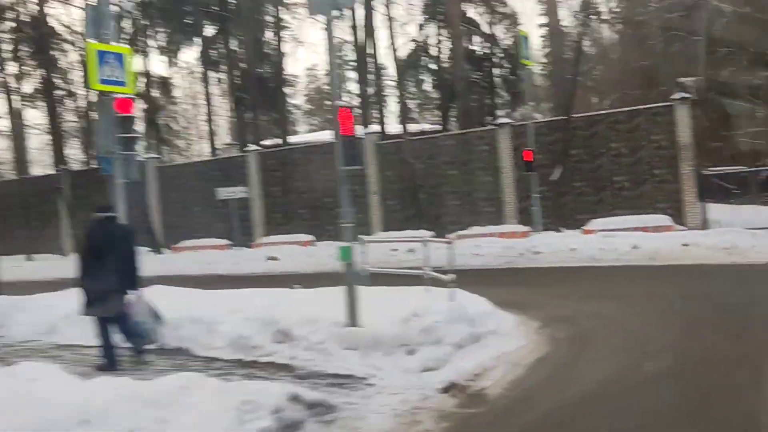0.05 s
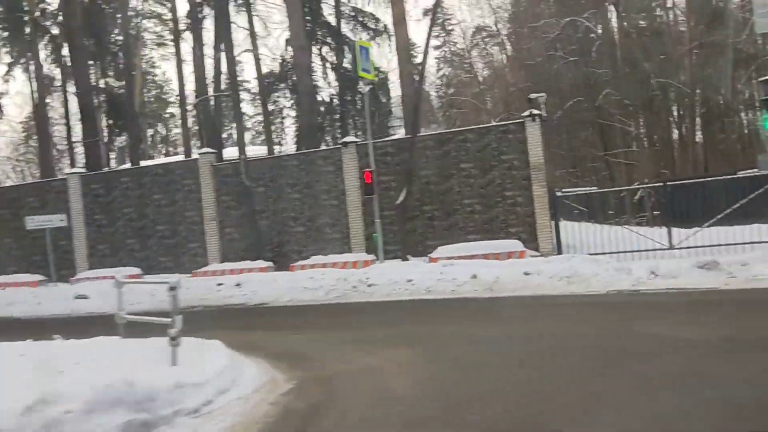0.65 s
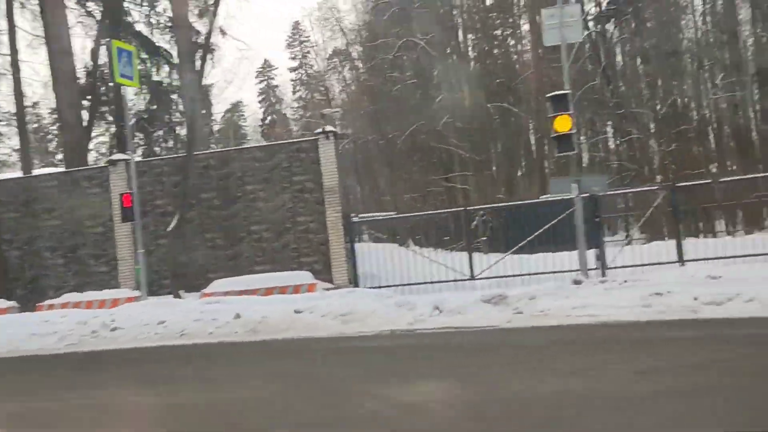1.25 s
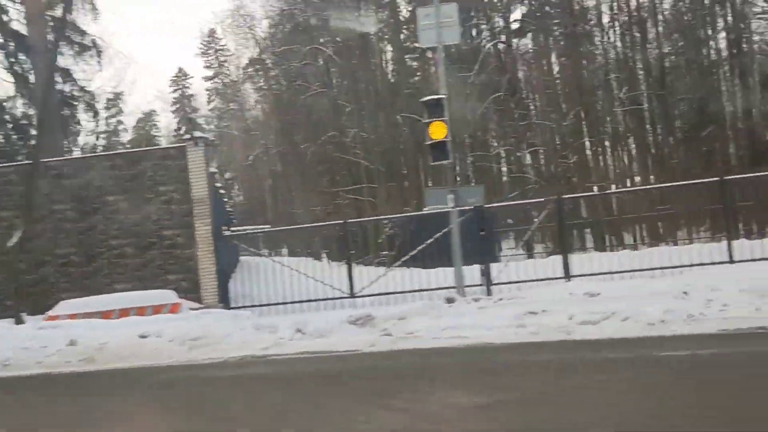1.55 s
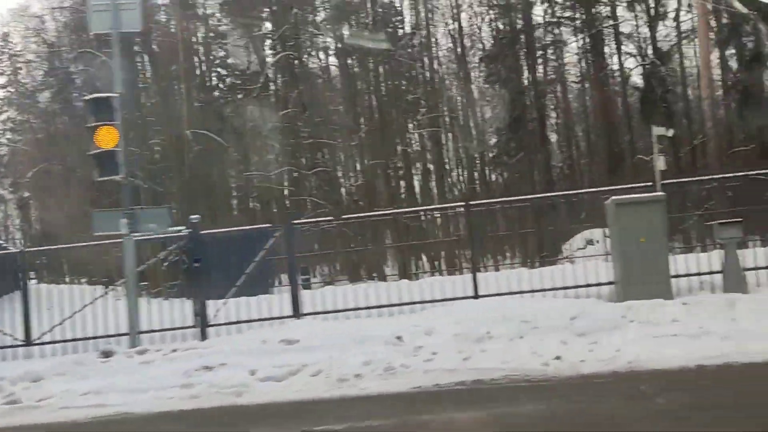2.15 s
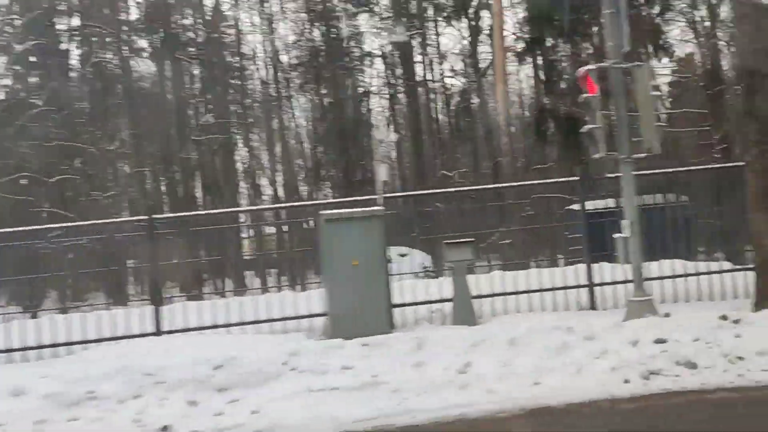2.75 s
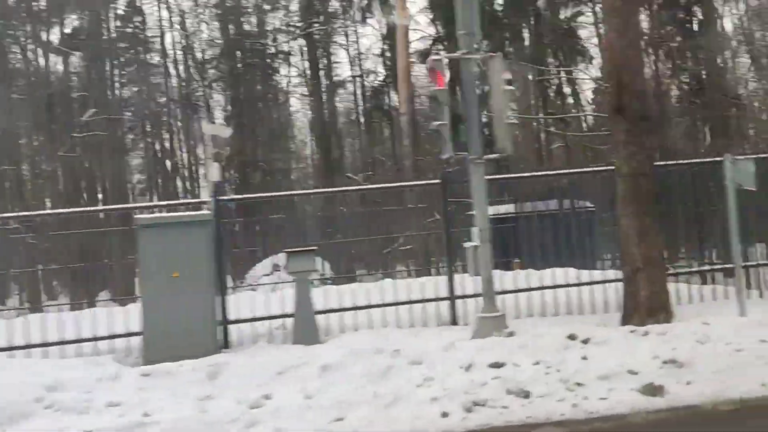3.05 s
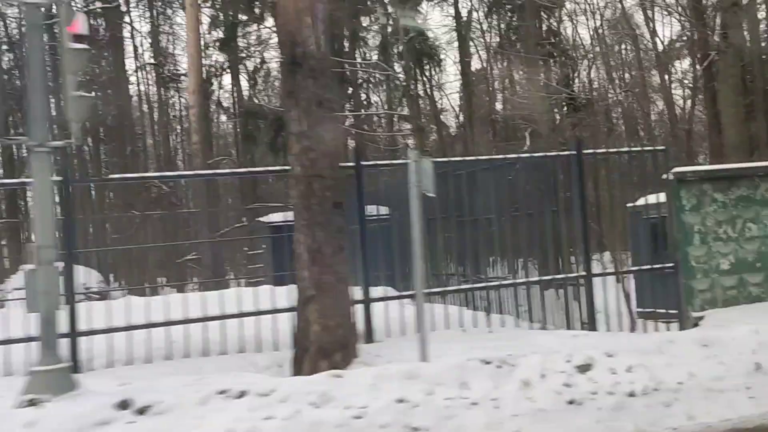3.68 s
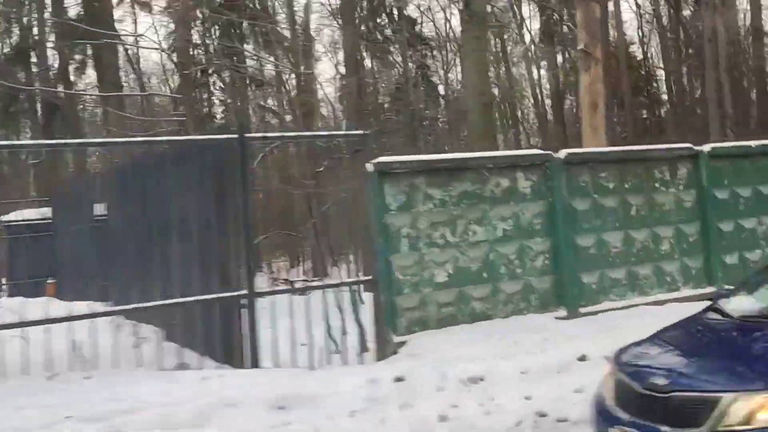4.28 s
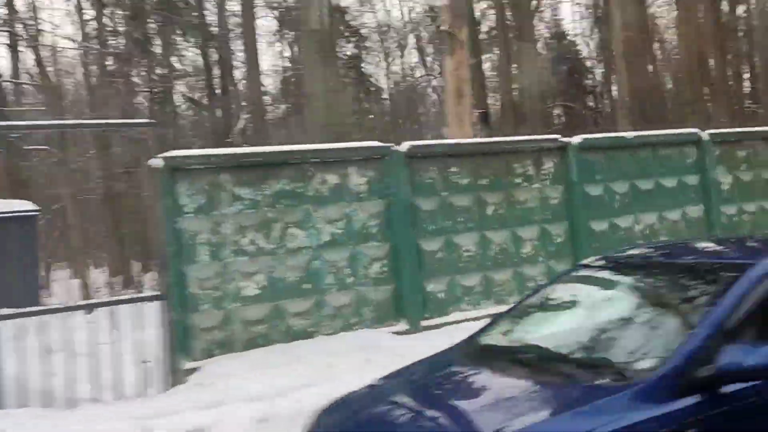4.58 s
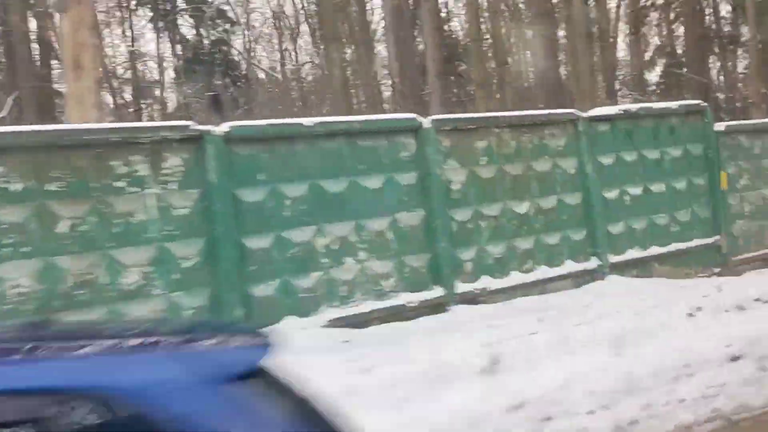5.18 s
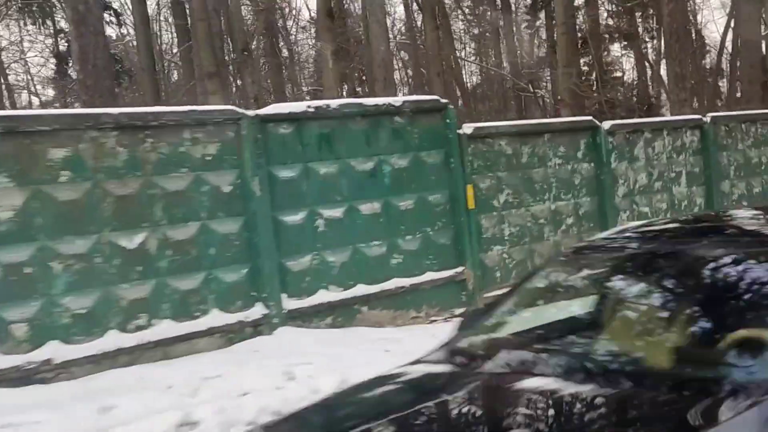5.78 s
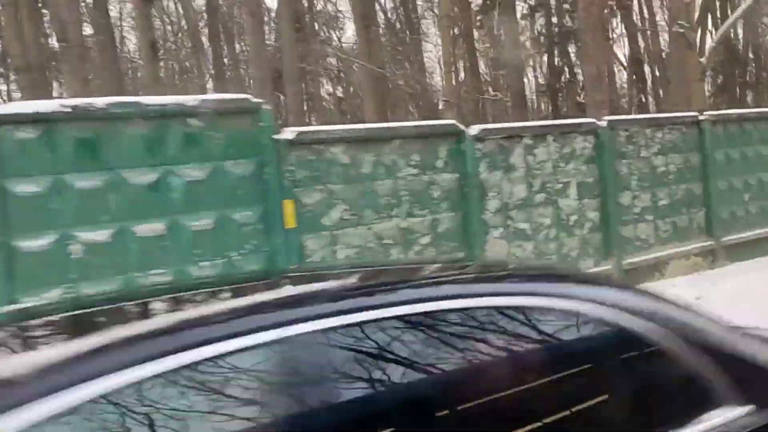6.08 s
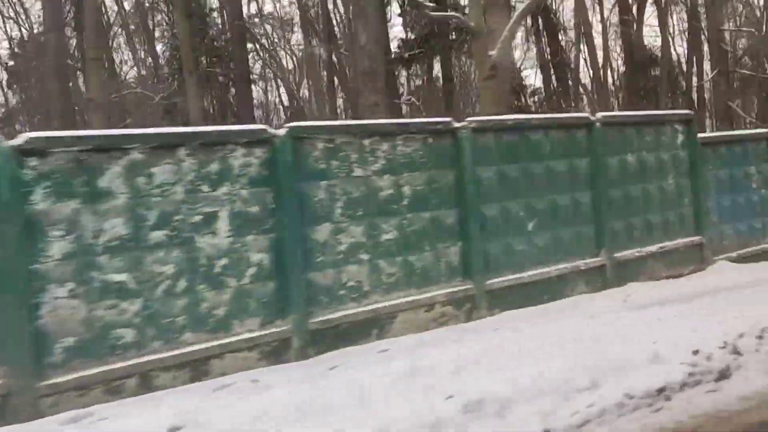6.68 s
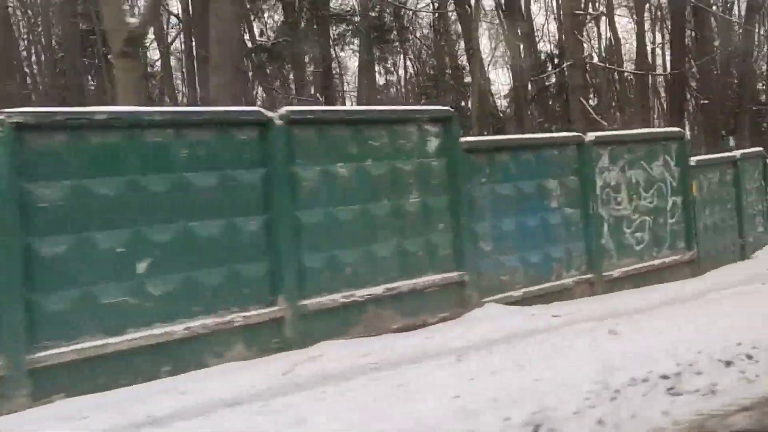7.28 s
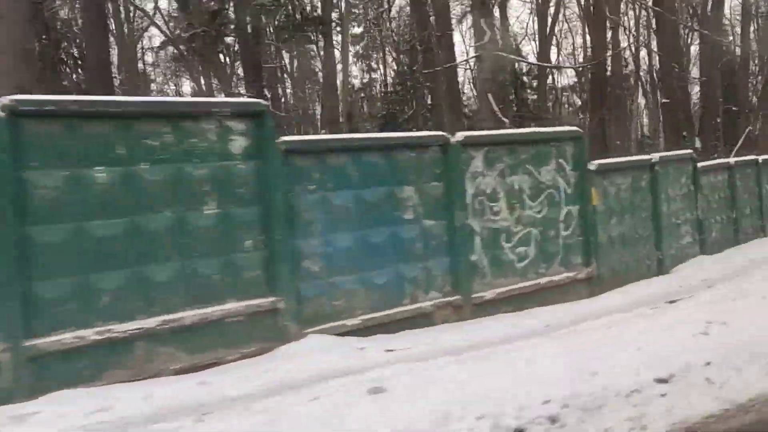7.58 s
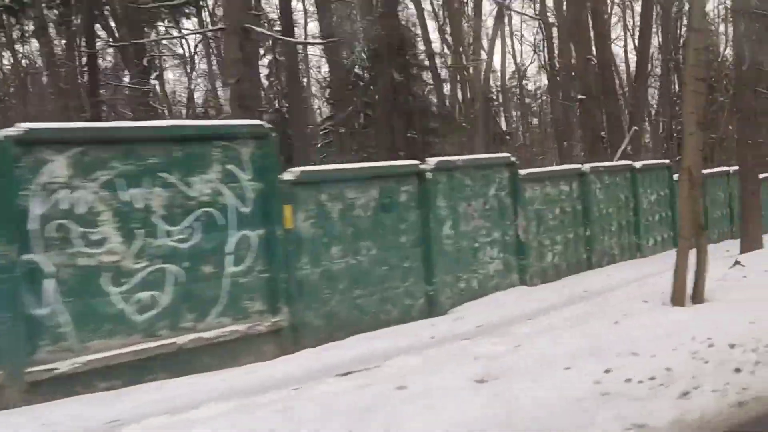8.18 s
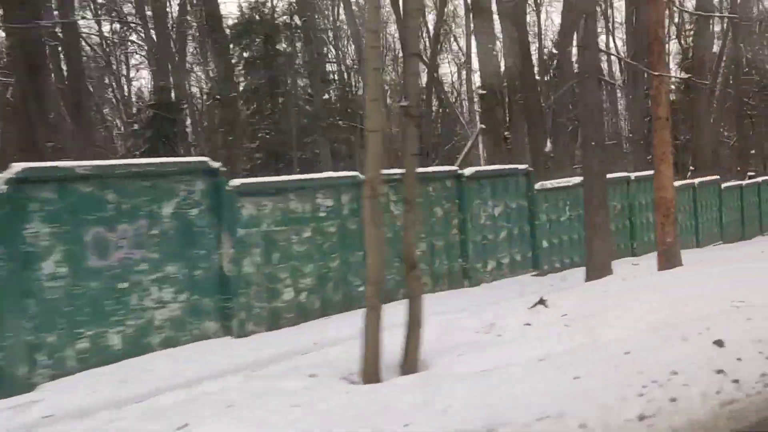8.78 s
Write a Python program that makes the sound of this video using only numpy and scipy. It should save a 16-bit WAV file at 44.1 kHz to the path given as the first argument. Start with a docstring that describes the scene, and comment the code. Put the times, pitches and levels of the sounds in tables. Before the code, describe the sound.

Inside a city bus, heard in stereo from a passenger seat. A bright rattle and clink of loose metal fittings sound right at the start. Over the first two seconds the diesel engine sinks to a low boom, while the body rumbles in uneven swells. From about 2.6 seconds the bus pulls away with a cluster of rattles: engine drone, fan hum and gear whine rise, joined by a fine clatter. Around 4 seconds the revs dip briefly, then climb again, and a thin, breathy turbocharger whistle glides upward until about 6.4 seconds. Tyre rumble grows through the floor. Near 7 seconds the engine eases off and drops in pitch, and the whistle slides down and fades. A fitting clinks at about 7.5 seconds. The bus rolls on at a steady drone until 9 seconds. Short, light rattles are scattered throughout.

```python
"""Inside a city bus, on a stereo pair of microphones at a passenger seat, loose fittings rattling nearby.
The diesel sinks to a low boom as the bus rounds a corner, the body rumbling on its springs. From about
2.6 s it pulls away up a road: engine, fan and gear whine glide through the cabin's resonances, the
turbocharger spools up to a thin whistle and the tyres grow louder through the floor. Near 7 s the
driver lifts off, the turbocharger spools down and the bus rolls on at a steady drone."""
import sys
import numpy as np
from scipy import signal
from scipy.fft import rfft, irfft, next_fast_len
from scipy.io import wavfile
from scipy.ndimage import uniform_filter1d

SR = 44100
rng = np.random.default_rng(int(sys.argv[2]) if len(sys.argv) > 2 else 0)


def unload_wav(signal):
    """Save mono or channel-first audio to the path in sys.argv[1] as 16-bit WAV at rate SR, clipped to [-1, 1]."""
    wavfile.write(
        sys.argv[1],
        SR,
        np.round(np.clip(np.atleast_2d(signal).T, -1, 1) * 32767).astype(np.int16),
    )


N = 398663
TIME = np.arange(N) / SR
FFT_SIZE = next_fast_len(N + 8000)
BIN_HZ = np.maximum(np.fft.rfftfreq(FFT_SIZE, 1 / SR), 1)


def from_db(db):
    """Decibels to gain."""
    return 10 ** (np.asarray(db) / 20)


def unit_rms(x):
    """Scale to unit power."""
    return x / np.sqrt(np.mean(x ** 2) + 1e-20)


def over_time(curve):
    """Read (time, value) rows at every sample."""
    return np.interp(TIME, *np.transpose(curve))


def over_frequency(curve):
    """Read (frequency, value) rows at every bin, on a log axis."""
    hz, value = np.transpose(curve)
    return np.interp(np.log(BIN_HZ), np.log(hz), value)


def colour(x, gain):
    """Filter by a gain over frequency."""
    return irfft(rfft(x, FFT_SIZE) * gain, FFT_SIZE)[..., :N]


def drift(rate_hz):
    """A smooth random wander with a spread of 1."""
    hop, settle = 40, 2000
    pole = np.exp(-2 * np.pi * rate_hz * hop / SR)
    noise = rng.standard_normal(N // hop + settle + 2)
    slow = signal.lfilter([1], [1, -2 * pole, pole * pole], noise)[settle:]
    return np.interp(np.arange(N) / hop, np.arange(len(slow)), unit_rms(slow))


def tone(turns, rough, flutter_hz):
    """A sine on a running phase; the shaking cabin scatters a share of it into narrow noise."""
    carrier = np.exp(2j * np.pi * (turns + rng.random()))
    scatter = rough * (drift(flutter_hz) + 1j * drift(flutter_hz)) / np.sqrt(2)
    return np.sqrt(2 / (1 + rough ** 2)) * np.real(carrier * (1 + scatter))


def wide_tone(turns, rough, flutter_hz):
    """A high tone reaches each microphone by paths of its own."""
    return np.array([tone(turns, rough, flutter_hz) for channel in range(2)])


def cabin_noise(spectrum):
    """Diffuse noise: long waves reach both microphones alike, short ones do not."""
    # stereo width at the seat: (frequency [Hz], side minus mid [dB])
    width_curve = [(25, -34), (80, -14.5), (170, -20), (340, -9), (600, -5.5), (1100, 4.5), (2000, -0.5),
                   (14000, 0.5)]
    width = from_db(over_frequency(width_curve))
    roll_off = np.minimum(1, np.minimum(BIN_HZ / spectrum[0][0], spectrum[-1][0] / BIN_HZ)) ** 4
    gain = from_db(over_frequency(spectrum)) * roll_off / np.sqrt(1 + width ** 2)
    mid, side = rng.standard_normal((2, N))
    return unit_rms(colour(mid, gain) + colour(side, gain * width) * [[1], [-1]])


def cabin_gain(hz, between_modes_db=-24, waver_db=0.8):
    """At the seat a tone swells on a resonance, sinks where reflections cancel, and wavers."""
    # air resonances of the cabin: (frequency [Hz], half width [Hz], level [dB])
    modes = [(30.6, 2.2, 3), (35.3, 2.5, -0.5), (39.8, 1.8, -1), (45.0, 2.5, 3), (74.6, 7.2, -4.5),
             (78.6, 1.5, -2.5), (82, 2.6, 0.7), (93.2, 4.7, -2), (149.7, 10.5, -9), (172.5, 6.5, -1.5),
             (182, 4.5, -1.5), (229, 15, 1.3), (254, 12, -6.5), (265, 14, -3), (446.4, 7, -2.2),
             (523, 23, -4)]
    # cancellations at the seat: (frequency [Hz], half width [Hz], depth [dB])
    nulls = [(37.5, .6, -6), (49, 1.2, -7), (64, 4, -6), (135, 8, -6), (158, 4, -9), (195, 5, -4),
             (215.5, 2, -4), (269, 1.5, -6)]
    grid_hz = np.arange(20, 600, .5)
    power = sum((from_db(db) * resonance(grid_hz, centre, width)) ** 2 for centre, width, db in modes)
    nulls_db = sum(db * resonance(grid_hz, centre, width) for centre, width, db in nulls)
    response = np.sqrt(power + from_db(between_modes_db) ** 2) * from_db(nulls_db)
    return np.interp(hz, grid_hz, response) * from_db(waver_db * drift(7))


def resonance(hz, centre_hz, half_width_hz):
    """A bell-shaped peak of height 1."""
    return 1 / (1 + ((hz - centre_hz) / half_width_hz) ** 2)


def ring(hits, strength, modes):
    """Contacts set modes ringing; each reaches the two microphones with strengths of its own."""
    out = np.zeros((2, N))
    for hz, level_db, t60 in modes:
        clicks = np.full((2, N), 1e-18)
        for channel in clicks:
            np.add.at(channel, hits, strength * rng.standard_normal(hits.shape))
        pole, angle = from_db(-60 / (t60 * SR)), 2 * np.pi * hz / SR
        feedback = [1, -2 * pole * np.cos(angle), pole * pole]
        out += from_db(level_db) * signal.lfilter([0, np.sin(angle)], feedback, clicks)
    return out


def engine_db(firing_hz, load, coast_db, octave_db, load_db, cruise_hz=36):
    """A level: coast_db coasting at cruise, plus octave_db per doubling of speed, load_db at full load."""
    return coast_db + octave_db * np.log2(firing_hz / cruise_hz) + load_db * load


def roar_level_db(firing_hz, load):
    """The engine's roar grows with speed and hardly changes with load."""
    return engine_db(firing_hz, load, coast_db=-27.5, octave_db=11.1, load_db=-0.17)


def tyres():
    """The tyres rumble through the floor, louder as the bus gathers speed."""
    # rumble at the seat: (time [s], level [dB])
    levels = [(0, -36), (3, -37.5), (7.5, -26.5), (9.04, -27.5)]
    # its colour: (frequency [Hz], relative level [dB])
    spectrum = [(55, -17), (77, 9), (95, -5), (120, 0.5), (165, -17), (183, -7), (195, -9), (208, -2),
                (260, -17), (280, -11), (302, -24), (329, -9), (355, -14), (400, -6.5), (470, -24),
                (650, -24)]
    return from_db(over_time(levels)) * cabin_noise(spectrum)


def body_sway(steady_db=-24.5, waver_db=3.5, swell_s=0.18):
    """The body sways on its springs; the low rumble swells and fades unevenly."""
    # swells of the rumble: (time [s], level [dB])
    swells = [(.17, -16), (2.1, -20), (2.55, -14), (3.35, -17), (4.1, -19), (5.4, -17), (5.95, -17),
              (6.55, -20), (7.46, -18)]
    # the body's rumble: (frequency [Hz], relative level [dB])
    spectrum = [(13, -16), (17, -10), (24, -1), (33, -15), (45, -7.5), (58, -24)]
    swell_power = sum(from_db(db) ** 2 * np.exp(-((TIME - s) / swell_s) ** 2) for s, db in swells)
    steady = from_db(steady_db + waver_db * drift(6.3))
    return np.sqrt(steady ** 2 + swell_power) * cabin_noise(spectrum)


def clinks(bounce_s=0.002):
    """Twice a fitting bounces on a metal bar, which rings on."""
    # blows on the bar: (time [s], strength [dB])
    blows = [(0.004, -24), (7.552, -24)]
    # the bar's ringing: (frequency [Hz], level [dB], t60 [s])
    bar_modes = [(6300, -13, .17), (6540, -14, .15), (8260, -12, .2), (8480, -11, .2)]
    start_s, strength_db = np.transpose(blows)[..., None]
    hits = ((start_s + bounce_s * np.arange(3)) * SR).astype(int)
    return ring(hits, from_db(strength_db), bar_modes)


def rattles(contacts=7, contact_s=0.0025, blur_s=0.0008, cabin_t60_s=0.29, tail_db=-1.5):
    """A loose fitting bounces: its metal rings, the panel behind knocks, the cabin adds a short tail."""
    # bursts of chatter: (time [s], strength [dB], length [s], knock relative to strength [dB])
    bursts = [(0.0034, -17.5, 0.027, -28), (0.0494, -32, 0.02, -14), (0.1094, -29, 0.05, -12),
              (0.633, -35, 0.0085, -10), (1.2276, -31, 0.016, -12), (1.3069, -32.5, 0.025, -12),
              (1.473, -32, 0.025, -6), (1.776, -29, 0.031, -22), (2.0534, -26, 0.03, 4.5),
              (2.648, -27, 0.023, -3), (2.712, -26, 0.027, -14), (2.7931, -23, 0.026, -8),
              (2.8094, -27, 0.023, 4), (3.2705, -33, 0.011, -14), (3.829, -22.5, 0.037, -14),
              (3.8594, -35, 0.014, -12), (4.559, -33, 0.0095, -12), (5.5418, -25, 0.013, -8),
              (6.319, -34, 0.018, -12), (6.5066, -29.5, 0.041, -14), (7.5512, -24.5, 0.014, -13),
              (9.0097, -31, 0.019, -14)]
    # noise of the contacts: (frequency [Hz], relative level [dB])
    spectrum = [(1000, 1), (2500, 6.5), (4000, 5.5), (6000, 9), (8500, 15), (10500, 8), (12500, 6.5),
                (14300, -3)]
    # ringing of the fittings: (frequency [Hz], level [dB], t60 [s])
    metal_modes = [(5000, -17, .03), (6330, -18, .045), (6560, -18, .04), (7700, -17, .06),
                   (8350, -13, .08), (8620, -14, .08), (8830, -14, .09), (9350, -18, .07),
                   (12850, -21, .05)]
    # knock of the panel: (frequency [Hz], level [dB], t60 [s])
    panel_modes = [(3130, -13, .015), (3870, -9, .014), (4100, -8, .016), (4450, -8, .014),
                   (4680, -10, .012), (4900, -8, .016)]
    start_s, strength_db, length_s, knock_db = np.transpose(bursts)[..., None]
    bounce = np.arange(contacts)
    lateness, softness = (rng.random((len(bursts), 2, contacts)) * (bounce > 0)).swapaxes(0, 1)
    progress = (bounce + lateness) / contacts
    hits = np.clip(((start_s + length_s * progress) * SR).astype(int), 0, N - 1)
    strength = from_db(strength_db - 3.5 * progress - 4.5 * softness)
    power = np.bincount(hits.ravel(), strength.ravel() ** 2, N)
    direct = signal.lfilter([1], [1, -np.exp(-1 / (contact_s * SR))], power + 1e-18)
    blur = np.exp(-1 / (blur_s * SR))
    direct = signal.lfilter([1 - blur], [1, -blur], direct)   # near reflections blunt the attack
    fade = from_db(-60 / (cabin_t60_s * SR)) ** 2
    tail = signal.lfilter([1 - fade], [1, -fade], direct)
    clash = from_db(3) * np.sqrt(direct + from_db(tail_db) ** 2 * tail) * cabin_noise(spectrum)
    metal = ring(hits, strength, metal_modes)
    knock = ring(hits, strength * from_db(knock_db), panel_modes)
    return clash + metal + knock


def turbocharger(skirt_db=-3, waver_db=2.1):
    """A breathy whistle in a wider skirt of rushing air, gliding as the rotor spools up and down."""
    # the rotor's whistle: (time [s], pitch [Hz], level [dB])
    spool = [(0, 8860, -41), (.3, 8360, -38.5), (.45, 8100, -43), (.6, 7900, -59), (3.6, 7900, -58),
             (3.9, 8060, -40), (4.1, 8280, -33.5), (4.27, 8520, -36), (4.45, 8830, -41), (4.6, 9300, -47),
             (4.8, 9850, -43), (5.0, 10150, -45), (5.1, 10380, -41), (5.25, 10460, -42), (5.4, 10750, -54),
             (5.7, 11600, -50), (5.92, 12200, -42.5), (6.35, 12600, -44), (6.6, 12380, -49),
             (6.8, 11950, -47), (7.0, 11150, -53), (7.3, 9700, -48), (7.55, 8650, -43.5),
             (7.72, 8150, -45.5), (7.85, 7950, -55), (9.04, 7960, -62)]
    time_s, pitch_hz, level_db = np.transpose(spool)
    gain = from_db(np.interp(TIME, time_s, level_db) + waver_db * drift(9))
    turns = np.cumsum(np.interp(TIME, time_s, pitch_hz)) / SR
    whistle = wide_tone(turns, rough=8, flutter_hz=90)
    skirt = wide_tone(turns, rough=9, flutter_hz=330)
    return gain * (whistle + from_db(skirt_db) * skirt)


def panel_hum(firing_hz, firings, load, order=17.5):
    """Under load a panel sings briefly as a high crankshaft order passes through its resonance."""
    swell = resonance(order * firing_hz, centre_hz=818, half_width_hz=16)
    return from_db(-42) * load * swell * tone(order * firings, rough=.8, flutter_hz=9)


def gears(firing_hz, firings, load, order=28, surge_hz_per_s=8, surge_db=2.7):
    """Meshing teeth whine through resonances; their overtones squeal while the engine changes speed."""
    # mesh tone radiated by the casing: (frequency [Hz], level [dB])
    casing = [(810, -49.5), (870, -53), (925, -47), (955, -45.5), (975, -47), (997, -44.5), (1008, -44),
              (1025, -43), (1060, -57), (1130, -53), (1160, -47.5), (1205, -46), (1275, -52), (1325, -43),
              (1380, -44.5)]
    # overtones of the mesh: (multiple of the mesh rate, relative level [dB])
    multiples = [(2, 0), (3, 2), (4, 0), (5, -1), (6, 0), (8, 0)]
    # how floor and panels radiate the overtones: (frequency [Hz], gain [dB])
    panels = [(1600, -53), (1850, -53), (2000, -57), (2600, -60), (3000, -59), (3230, -54), (3420, -53.5),
              (3550, -58), (3700, -54), (3860, -49.5), (4050, -57), (4500, -62), (5000, -58), (6000, -59),
              (7200, -66), (7850, -58), (8060, -50), (8300, -58), (9500, -64)]
    mesh = order * firings
    speed_change = abs(np.gradient(firing_hz)) * SR
    surge = uniform_filter1d(np.minimum(1, speed_change / surge_hz_per_s), size=SR // 10)
    direct = tone(mesh, rough=.2, flutter_hz=8)
    reflected = wide_tone(mesh, rough=5, flutter_hz=13)
    whine_db = np.interp(order * firing_hz, *np.transpose(casing)) + (.5 + surge) * drift(7)
    whine = from_db(whine_db) * (.75 * direct + .52 * reflected)
    overtones = sum(from_db(db + 2 * drift(6)) * wide_tone(k * mesh, rough=k, flutter_hz=10 * k)
                    for k, db in multiples)
    squeal_db = engine_db(firing_hz, load, coast_db=-1.5, octave_db=4, load_db=-0.5) + surge_db * surge
    return whine + colour(overtones * from_db(squeal_db), from_db(over_frequency(panels)))


def cooling_fan(firing_hz, firings, load, order=5.47):
    """The belt-driven fan hums at its blade rate; its rough overtones grow with speed and load."""
    blades, blade_hz = order * firings, order * firing_hz
    hum = cabin_gain(blade_hz) * tone(blades, rough=.24, flutter_hz=6)
    second = cabin_gain(2 * blade_hz) * tone(2 * blades, rough=.8, flutter_hz=11)
    third = from_db(-20) * wide_tone(3 * blades, rough=1, flutter_hz=9)
    hum_db = engine_db(firing_hz, load, coast_db=-27.5, octave_db=17, load_db=3.6)
    overtone_db = engine_db(firing_hz, load, coast_db=-40, octave_db=8, load_db=9.5)
    return from_db(hum_db) * hum + from_db(overtone_db) * (second + third)


def running_noise(firing_hz, firings, load):
    """Road and engine noise through the body, pulsing with the firings; under load the clatter trembles."""
    # the cabin's boom: (frequency [Hz], relative level [dB])
    boom_spectrum = [(35, -13), (57, -43), (77, 11.5), (100, -4.5), (130, -3.5), (155, -6), (178, 3),
                     (220, -6), (265, -2), (310, -31)]
    # the engine's roar: (frequency [Hz], relative level [dB])
    roar_spectrum = [(200, -1), (300, -1), (330, 2), (395, 0), (435, -7), (480, -6), (530, -5.5),
                     (630, -12), (780, -12.5), (1000, -19.5), (1600, -26)]
    # the rush of air: (frequency [Hz], relative level [dB])
    rush_spectrum = [(600, -5), (1000, 9.5), (1400, 7), (1700, 4.5), (2000, 6.5), (2450, 1), (3000, 3),
                     (3550, -0.5), (4000, 1), (5500, -4.5), (9000, 1.5), (14000, -10)]
    # the fine clatter: (frequency [Hz], relative level [dB])
    clatter_spectrum = [(2500, -5), (4300, 0), (5100, 5), (6000, 1), (7200, 6.5), (8100, 12), (9000, 3.5),
                        (10000, 2), (11200, -10), (12400, -24), (13000, -54), (14300, -51)]
    boom_db = engine_db(firing_hz, load, coast_db=-23.5, octave_db=6.7, load_db=1.4)
    rush_db = engine_db(firing_hz, load, coast_db=-36.5, octave_db=9, load_db=2.17)
    clatter_db = engine_db(firing_hz, load, coast_db=-46, octave_db=11.5, load_db=14.13)
    beat = np.cos(2 * np.pi * firings)
    boom = from_db(boom_db) * cabin_noise(boom_spectrum)
    roar = from_db(roar_level_db(firing_hz, load) - 0.6 + 0.9 * beat) * cabin_noise(roar_spectrum)
    rush = from_db(rush_db + 0.2 * beat) * cabin_noise(rush_spectrum)
    tremble_depth = from_db((clatter_db - clatter_db.max()) / 2)
    tremble_db = tremble_depth * (1.66 * drift(23) + 0.25 * beat)
    clatter = from_db(clatter_db + tremble_db) * cabin_noise(clatter_spectrum)
    return boom + roar + rush + clatter


def diesel(firing_hz, firings, load):
    """Firing harmonics hum in the cabin; unequal cylinders add weak orders that grow with the roar."""
    # weak crankshaft orders: (multiple of the firing rate, level relative to the strain [dB])
    crank_orders = [(1.5, -5), (2.5, -6.5), (3, -2), (3.5, -5.5), (4.5, -14), (7, -23), (8, -19.5),
                    (14, -30.5)]
    harmonic_db = {1: engine_db(firing_hz, load, coast_db=-21.5, octave_db=0, load_db=2.4),
                   2: engine_db(firing_hz, load, coast_db=-25, octave_db=0, load_db=10.9),
                   4: engine_db(firing_hz, load, coast_db=-31, octave_db=8, load_db=15.5),
                   5: engine_db(firing_hz, load, coast_db=-36.5, octave_db=2.8, load_db=8.3)}
    out = np.zeros(N)
    for order, db in harmonic_db.items():
        gain = from_db(db) * cabin_gain(order * firing_hz)
        out += gain * tone(order * firings, rough=.08, flutter_hz=3)
    roar_db = roar_level_db(firing_hz, load)
    strain = from_db(roar_db + 0.35 * (roar_db - roar_db.max()))   # falls away faster than the roar
    for order, db in crank_orders:
        out += strain * from_db(db) * tone(order * firings, rough=0.71, flutter_hz=6.4)
    return out


def scene():
    """The cabin from the seat: one crankshaft and one throttle drive the engine, over road and rattles."""
    # speed of the four-cylinder diesel: (time [s], firing rate [Hz])
    speed = [(0.0, 43.06), (0.3, 40.53), (0.55, 36.2), (0.7, 35.6), (0.95, 36.6), (1.35, 34.0),
             (1.85, 29.55), (2.05, 28.85), (2.55, 29.8), (2.85, 32.3), (3.65, 41.73), (3.87, 43.1),
             (4.3, 39.35), (4.65, 40.5), (5.0, 40.6), (5.35, 41.0), (6.0, 45.75), (6.3, 47.6), (6.7, 49.2),
             (6.85, 48.63), (7.05, 44.2), (7.55, 36.35), (7.9, 36.0), (9.04, 35.5)]
    # the driver's foot: (time [s], load [0-1])
    throttle = [(0, 0.76), (.25, 0.7), (.55, 0.3), (1.3, 0.05), (2.3, 0.27), (2.6, 0.5), (2.85, 1),
                (3.1, 0.8), (3.55, 0.89), (4.4, 0.88), (6.9, 0.83), (7.05, 0.39), (7.6, 0.37), (8.2, 0),
                (9.04, 0.1)]
    firing_hz, load = over_time(speed), over_time(throttle)
    firings = np.cumsum(firing_hz * (1 + .0008 * drift(6))) / SR   # running phase, one turn per firing
    engine_parts = (diesel, cooling_fan, gears, panel_hum, running_noise)
    engine = sum(part(firing_hz, firings, load) for part in engine_parts)
    return engine + turbocharger() + body_sway() + tyres() + rattles() + clinks()


def record(dry, ceiling=0.96, cutoff_hz=14230):
    """Each microphone port has its own colour; the highest peaks are rounded and the top is cut."""
    # the two ports, the right ringing near 8 kHz: (frequency [Hz], left minus right [dB])
    balance = [(60, 0.5), (300, -2.5), (700, -0.5), (1400, 2), (2200, 0.5), (3500, 0.5), (5000, -1.5),
               (7000, -3), (8000, -6.5), (8800, -4), (9800, 3), (13000, 0)]
    ports = from_db(over_frequency(balance) / 2 * np.array([[1], [-1]]))
    heard = colour(dry, ports)
    rounded = heard / (1 + (heard / ceiling) ** 10) ** .1
    low_pass = 1 / np.sqrt(1 + (BIN_HZ / cutoff_hz) ** 400)
    return colour(rounded, low_pass)


dry = scene()
out = record(dry)
unload_wav(out)
```